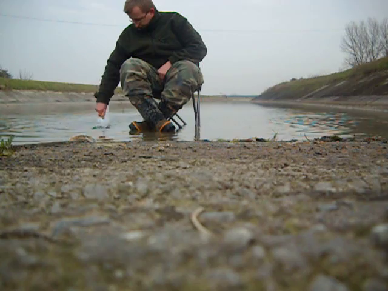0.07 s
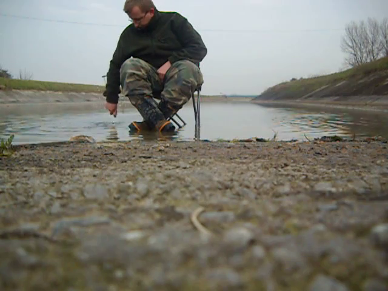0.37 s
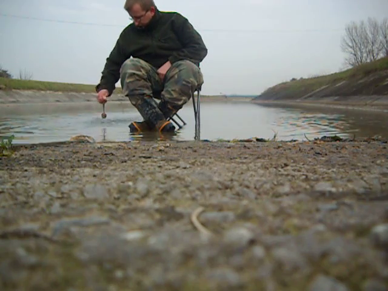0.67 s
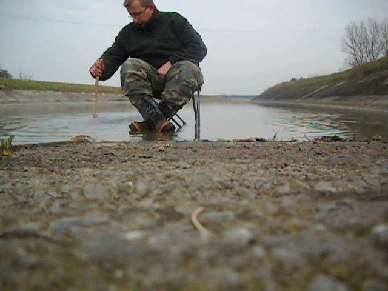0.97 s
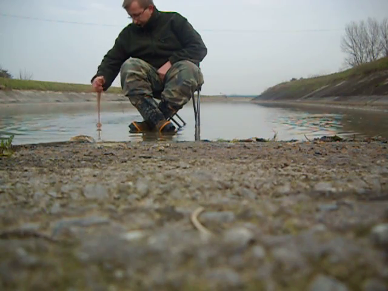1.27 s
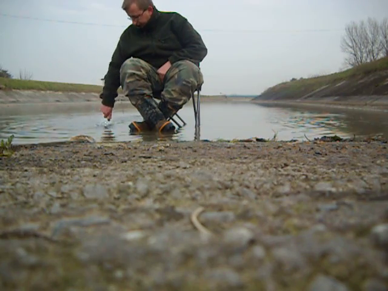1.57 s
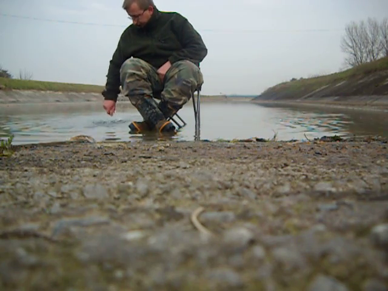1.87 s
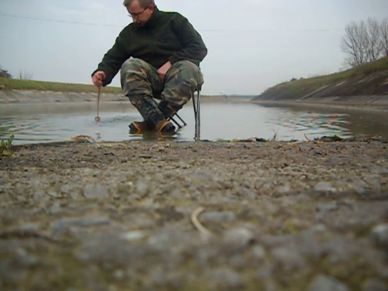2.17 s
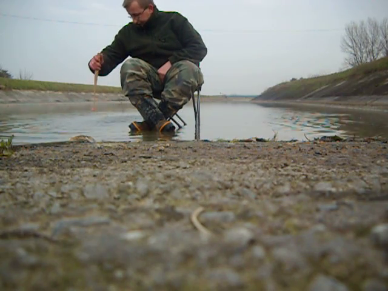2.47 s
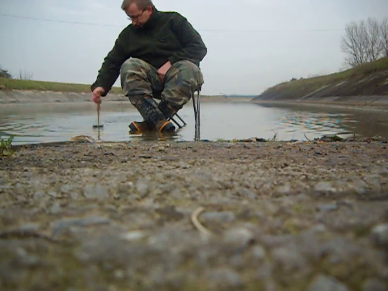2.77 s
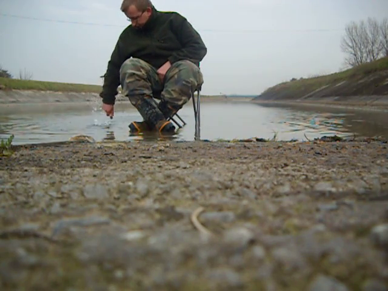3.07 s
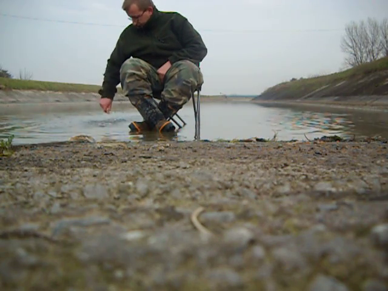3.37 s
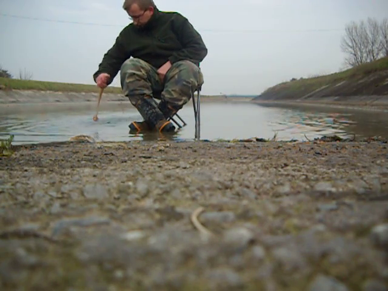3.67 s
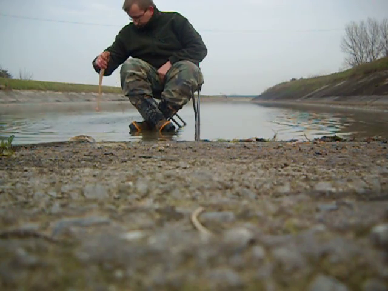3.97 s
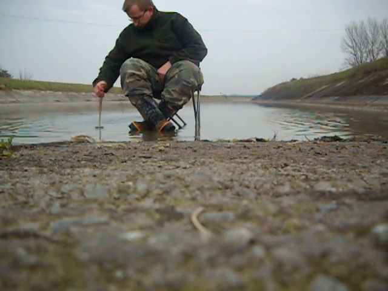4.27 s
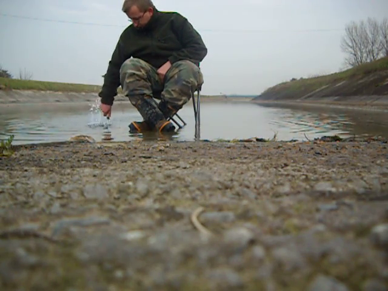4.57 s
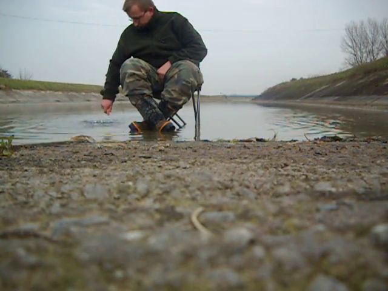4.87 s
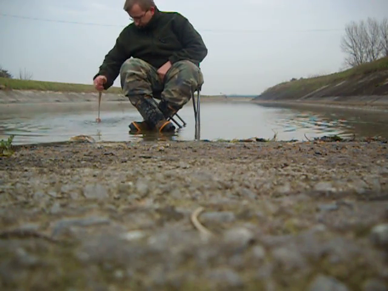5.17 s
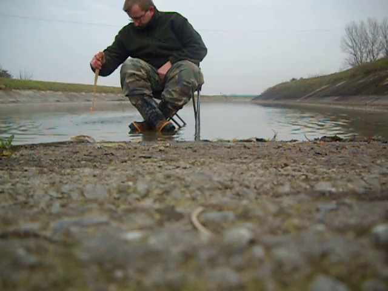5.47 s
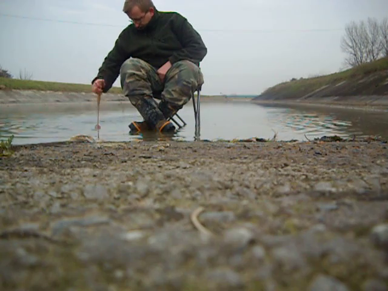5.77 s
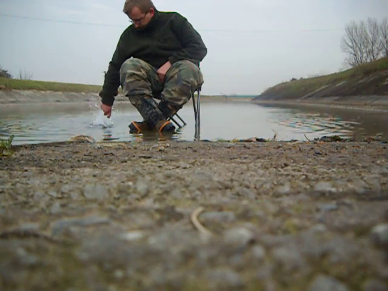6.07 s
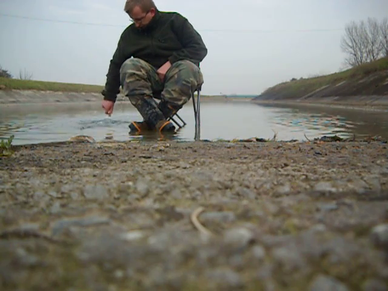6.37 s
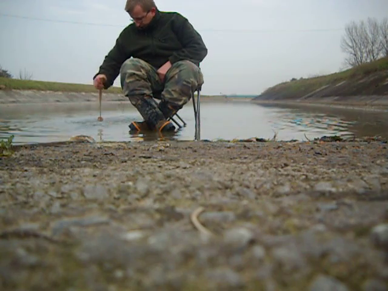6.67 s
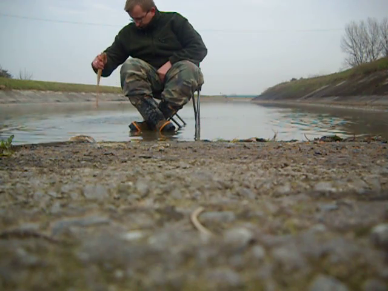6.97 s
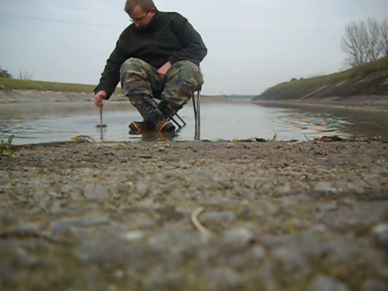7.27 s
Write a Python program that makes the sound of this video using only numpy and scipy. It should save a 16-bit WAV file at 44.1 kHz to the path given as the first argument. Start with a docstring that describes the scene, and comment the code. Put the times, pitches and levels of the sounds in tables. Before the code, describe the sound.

Over a soft outdoor hiss, six loud, rounded plops come at an even, unhurried pace as an angler drives a stick lure into still water. Each begins with a smack, bends upward in pitch and leaves droplets pattering and tiny bubbles ringing. Two very faint distant tones swell and fade after the first stroke. Heard from the gravel shore with slight dull echoes, through a small microphone with muffled highs that distorts briefly on the plops.

```python
"""A slap and a loud rising plop sound on calm water, six times, heard from the gravel shore.
An angler strikes with a clonk, a catfish lure on a stick: each stroke drags down an air pocket
that snaps shut and resonates. Spray patters back, trapping small bubbles that ring in turn.
The banks return faint echoes over steady outdoor air and two brief, distant tones.
A small narrow-band recorder overloads on every plop."""
import sys
import numpy as np
from scipy import signal
from scipy.fft import rfft, irfft
from scipy.io import wavfile

SR = 44100
rng = np.random.default_rng(int(sys.argv[2]) if len(sys.argv) > 2 else 0)


def transcribe(u):
    """Save the signal u as a 16-bit wav file named by the first command-line argument.

    u: samples, shape (n,) or (channels, n), limited to [-1, 1]; the rate is SR.
    q: integer samples, one column per channel.
    """
    v = np.clip(np.atleast_2d(u).T, -1, 1)
    q = np.round(v * 32767).astype(np.int16)
    wavfile.write(sys.argv[1], SR, q)


N = 327663
TIME = np.arange(N) / SR

# strokes: entry t/s, pocket closure t/s, relative pocket volume, top of the plop f/Hz,
# slap reference level/dB, spray reference level/dB
STROKES = [ (0.1108, 0.13, 0.97, 504, -17.5, -52.5), (1.4943, 1.52, 0.65, 481, -17, -53.5),
           (2.919, 2.9385, 1.09, 508, -18, -51.5), (4.4529, 4.4702, 0.98, 491, -17, -50),
           (5.971, 5.9832, 1.95, 571.3, -13, -50), (7.3950, 7.418, 0.71, 429, -14, -46)]
# spectrum of fine spray: f/Hz, relative level/dB
SPRAY_SPECTRUM = [(400, -19.5), (1000, -9.5), (1600, 0), (2300, 1.5), (2900, 0.5), (3500, -9),
                  (4200, -16.5)]


def plops(ring_db=3, push_db=-17, pinch_s=0.0018, growth_s=0.0067, seal_s=0.001, release_s=0.0024):
    """Cavity resonance: the air pocket throbs low while open, then shuts and rises as it shrinks."""
    out = np.zeros(N)
    for entry, shut, volume, top_hz, _, _ in STROKES:
        # a bigger pocket starts lower, lasts longer and is louder
        open_hz, shut_hz = 93 / np.sqrt(volume), 249.2 / np.cbrt(volume)
        glide_s, swell_s, decay_s = 0.0073 * volume ** 1.5, 0.0056 * volume, 0.0047 * np.sqrt(volume)
        age = TIME[:SR // 8] + entry - .004 - shut   # zero at closure
        before, after = np.minimum(age, 0), np.maximum(age, 0)
        pinching_hz = open_hz + (shut_hz - open_hz) * np.exp(before / pinch_s)
        shrinking_hz = top_hz - (top_hz - shut_hz) * np.exp(-after / glide_s)
        turns = np.cumsum(np.where(age < 0, pinching_hz, shrinking_hz)) / SR
        turns -= np.interp(0, age, turns)   # the pressure swings into suction as the pocket shuts
        seal = np.exp(before / seal_s)
        ring = 2 * seal / (np.exp((swell_s - age) / growth_s) + np.exp((age - swell_s) / decay_s))
        push = np.clip((age + shut - entry) / .003 + 1, 0, 1) * np.exp(-after / release_s)
        envelope = from_db(ring_db) * volume * ring + from_db(push_db) * push
        add(out, shut + age[0], -np.sin(2 * np.pi * turns) * envelope)
    return out


def slaps(tear_db=-5, wash_db=-25, bubble_db=-5.5, bubble_hz=2650, fade_db=2, spatter_db=4):
    """Impact noise: the clonk's head smacks in and traps bubbles; water tears as the pocket shuts."""
    # spectrum of the impact: f/Hz, relative level/dB
    slap_spectrum = [(150, -6.5), (400, -1.5), (800, 2.5), (1400, -1.5), (2000, 1), (2700, -8.5),
                     (3400, -9.5), (4200, -11)]
    smack, wash, rings = np.zeros((3, N))
    for entry, shut, *_, slap_db, _ in STROKES:
        smack += from_db(slap_db) * burst(entry + .0015, rise=.004, decay=0.008) ** 2
        wash += from_db(slap_db + tear_db) * burst(shut, rise=0.0037, decay=0.0058)
        wash += from_db(slap_db + wash_db) * burst(shut + 0.011, rise=0.0089, decay=0.051)
        for k, start in enumerate(np.linspace(entry + 0.0015, shut, 4, endpoint=False)):
            hz = bubble_hz * np.exp(.08 * rng.standard_normal())
            ring = bubble(hz, cycles=9, rise=.03, tick=.15)
            add(rings, start, from_db(slap_db + bubble_db - fade_db * k) * ring)
    # the torn sheet of water breaks up in clumps
    clumps = from_db(spatter_db * np.clip(noise([(300, 0), (600, -60)]), -2, 2))
    return smack * noise(slap_spectrum) + wash * clumps * noise(SPRAY_SPECTRUM) + rings


def spray(flight_s=.27, spread=0.39, mist_db=-9, grain_db=-2, size_db=5.0, centre_hz=2650, count=170):
    """Superposition of small impacts: droplets patter on a fine hiss after log-normal flight times."""
    patter, mist = np.zeros((2, N))
    for entry, *_, spray_db in STROKES:
        age = np.maximum(TIME - entry, 1e-3)
        mist += from_db(spray_db + mist_db) * np.exp(-.5 * (np.log(age / flight_s) / spread) ** 2)
        for late, size, pitch in rng.standard_normal((count, 3)):
            drop = bubble(centre_hz * np.exp(.2 * pitch), cycles=4.5, rise=0.053, tick=0.35)
            gain = from_db(spray_db + grain_db + size_db * min(size, 2))
            add(patter, entry + flight_s * np.exp(spread * late), gain * drop)
    return patter + mist * noise(SPRAY_SPECTRUM)


def large_drops(gain_db=-1.5):
    """Air entrainment: each of the largest drops traps one bubble and plinks."""
    # drops falling back: t/s, relative level/dB, bubble f/Hz
    landings = [(0.2708, -35.5, 2150), (0.4095, -35.5, 2710), (0.4624, -36, 1606), (1.5496, -30, 2800),
                (1.7165, -33.5, 2820), (1.778, -36.5, 2740), (1.7958, -37.5, 2270), (1.8857, -37, 3220),
                (3.12, -36, 2220), (3.168, -28.5, 2760), (3.265, -38.5, 2800), (4.584, -36.5, 1010),
                (4.7546, -33, 2330), (4.776, -37, 2740), (4.8252, -33, 3430), (4.8367, -27.5, 2760),
                (4.9671, -39.5, 2820), (6.0655, -34, 2850), (6.134, -35, 2540), (6.3267, -36, 2970),
                (6.3786, -35.5, 2980)]
    out = np.zeros(N)
    for start, level_db, hz in landings:
        add(out, start, from_db(level_db + gain_db) * bubble(hz, cycles=9.8, rise=0.042, tick=0.29))
    return out


def stray_bubbles(scatter_db=1.5, pitch_spread=.13, count=4):
    """Bubble resonance after each stroke: low notes in the closing hole, then drips off the head."""
    # bubble groups: mean delay t/s, spread t/s, median f/Hz, mean level/dB
    groups = [(.22, .06, 1443, -44), (.44, .06, 2840, -43)]
    out = np.zeros(N)
    for entry, *_ in STROKES:
        for delay, spread, hz, level_db in groups:
            for late, size, pitch in rng.standard_normal((count, 3)):
                drop = bubble(hz * np.exp(pitch_spread * pitch), cycles=8, rise=0.034, tick=.5)
                add(out, entry + delay + spread * late, from_db(level_db + scatter_db * size) * drop)
    return out


def bubble(hz, cycles, rise, tick, tick_s=0.0033, onset_s=0.00021):
    """Damped oscillation: a drop ticks on the surface and its trapped bubble rings, rising in pitch."""
    age = TIME[:SR // 25]
    life = age * hz / cycles   # age in decay times
    ring = np.sin(2 * np.pi * hz * age * (1 + rise * (np.minimum(life, 2) - 1))) * np.exp(-life)
    tick_band = signal.butter(2, [1400, 4200], "band", fs=SR, output="sos")
    spit = signal.sosfilt(tick_band, rng.standard_normal(len(age)))
    impact = tick * spit / np.std(spit) * np.exp(-age / tick_s)
    return (ring + impact) * (1 - np.exp(-age / onset_s))


def shore_echoes(water, near_db=-39, near_s=0.023, far_db=-42.0, far_s=0.18, smear_s=0.032):
    """Reflection and scattering: rough banks echo dully; near gravel and far slopes add a tail."""
    # reflections: delay t/s, level/dB before filtering, relative amplitude of the smeared part
    echoes = [(.034, -33.5, .05), (0.0448, -34.5, .15), (0.0995, -35.5, 0.06), (0.2247, -40.5, 0.88)]
    # spectrum of the ground scatter: f/Hz, relative level/dB
    scatter_spectrum = [(60, -29), (200, -12), (400, -1), (800, -2), (2000, 0), (4000, -5)]
    banks, roughness = np.zeros(N), rng.standard_normal(N)
    for delay, level_db, smear in echoes:
        add(banks, delay, from_db([level_db]))
        diffuse = roughness * burst(delay, 0.0074, smear_s) / np.sqrt(smear_s * SR / 2)
        banks += from_db(level_db) * smear * diffuse
    banks = signal.sosfilt(signal.butter(2, [330, 1500], "band", fs=SR, output="sos"), banks[:SR])
    tail = sum(from_db(level_db) * burst(0.028, 0.0069, decay) / np.sqrt(decay * SR / 2)
               for level_db, decay in [(near_db, near_s), (far_db, far_s)])
    impulse_response = banks + (tail * noise(scatter_spectrum))[:SR]
    return signal.fftconvolve(water, impulse_response)[:N]


def air(level_db=-46.5):
    """Stationary noise: outdoor air and microphone hiss form a steady floor."""
    # spectrum of the floor: f/Hz, relative level/dB
    air_spectrum = [(20, 5.5), (40, 3.5), (75, -3), (118, -10), (230, -13), (450, -15.5), (820, -18.5),
                    (3500, -24), (3850, -26.5), (4300, -37.5), (4900, -76)]
    return from_db(level_db) * noise(air_spectrum)


def far_tones():
    """Narrow-band noise: two faint, hazy tones swell and fade in the distance."""
    # distant tones: middle t/s, duration t/s, centre f/Hz, half-width f/Hz, level/dB
    tones = [(.91, 0.37, 1980, 130, -59.5), (1.075, 0.82, 595, 110, -59)]
    out = np.zeros(N)
    for middle, length, hz, width, level_db in tones:
        swell = np.cos(np.pi * np.clip((TIME - middle) / length, -.5, .5))
        band = [(hz / 2, -60), (hz - width, -10), (hz, 0), (hz + width, -10), (2 * hz, -60)]
        out += from_db(level_db) * swell * noise(band)
    return out


def noise(spectrum):
    """Spectral shaping: white noise takes on a colour given as (f/Hz, level/dB), at rms 1."""
    hz, level_db = np.transpose(spectrum)
    colour = np.interp(np.log(np.fft.rfftfreq(N, 1 / SR) + 1), np.log(hz), level_db)
    x = irfft(rfft(rng.standard_normal(N)) * from_db(colour), N)
    return x / np.std(x)


def burst(peak_s, rise, decay):
    """Exponential decay after a linear rise to the peak."""
    age = TIME - peak_s
    return np.clip(1 + age / rise, 0, 1) * np.exp(-np.clip(age / decay, 0, 20))


def add(out, start, sound):
    """Superposition of a short sound from a start time on."""
    at = int(np.clip(start * SR, 0, N))
    out[at:at + len(sound)] += sound[:N - at]


def from_db(db):
    """Amplitude ratio of a level in decibels."""
    return 10 ** (np.asarray(db) / 20)


def scene():
    """Superposition of the direct water sounds, their echoes and the background, in mono."""
    water = plops() + slaps() + spray() + large_drops() + stray_bubbles()
    return (water + shore_echoes(water) + air() + far_tones())[None]


def record(dry, low_cut_hz=45, band_edge_hz=3966, ceiling=0.68, high_cut_hz=15700):
    """Overload: the input clips, is band-limited, and the overshoot clips again in a faint crackle."""
    thinned = signal.sosfilt(signal.butter(2, low_cut_hz, "high", fs=SR, output="sos"), dry)
    clipped = np.clip(thinned, -ceiling, ceiling)
    low_pass = signal.firwin(121, band_edge_hz, window=("kaiser", 7), fs=SR)
    narrow = signal.fftconvolve(clipped, low_pass[None], "same")
    crackling = np.clip(narrow, -ceiling, ceiling)
    return signal.sosfilt(signal.cheby2(12, 70, high_cut_hz, fs=SR, output="sos"), crackling)


dry = scene()
out = record(dry)
transcribe(out)
```